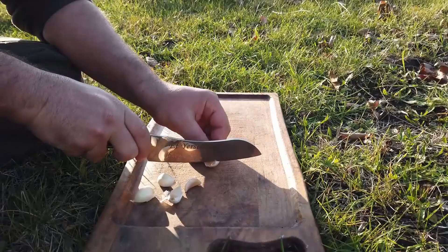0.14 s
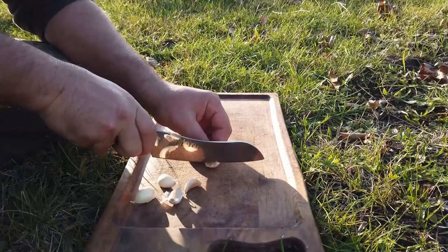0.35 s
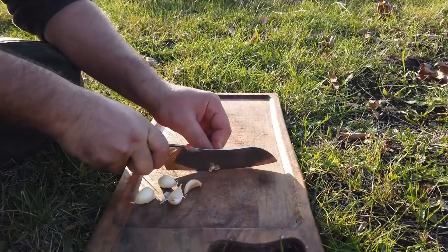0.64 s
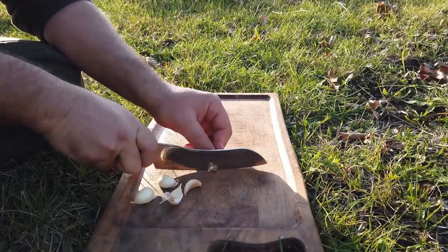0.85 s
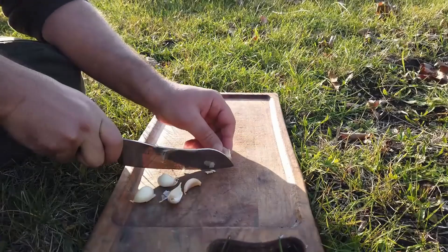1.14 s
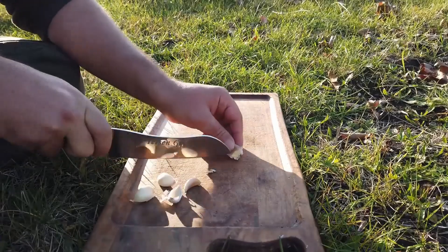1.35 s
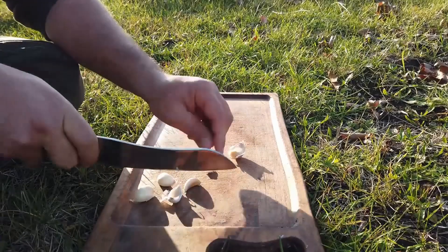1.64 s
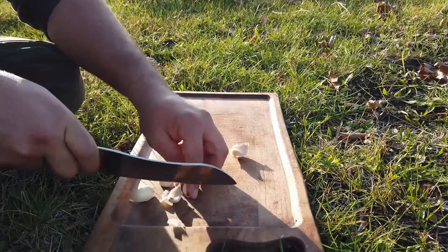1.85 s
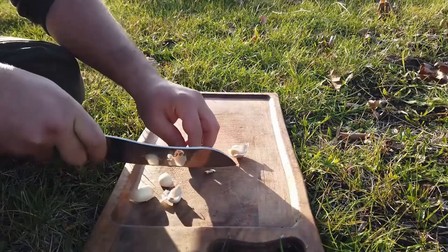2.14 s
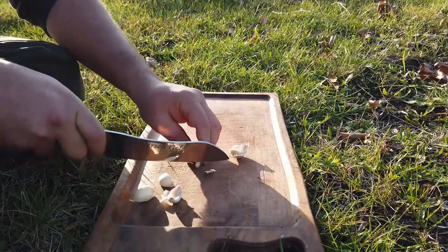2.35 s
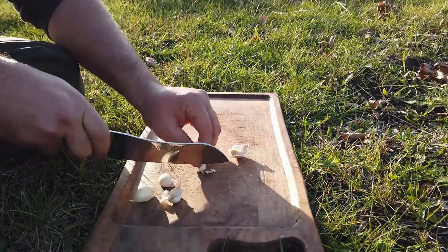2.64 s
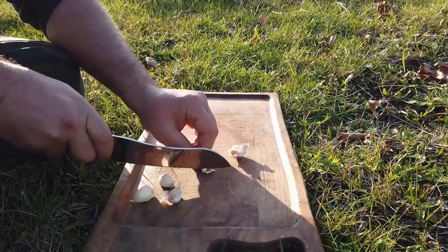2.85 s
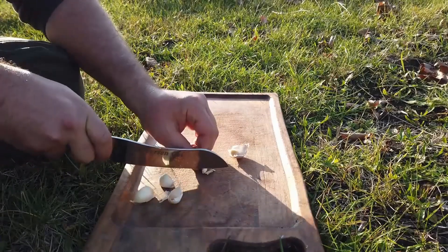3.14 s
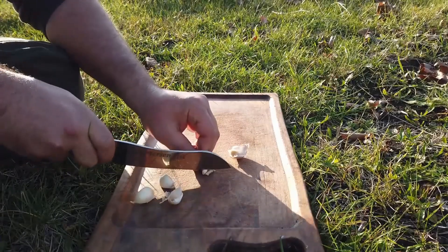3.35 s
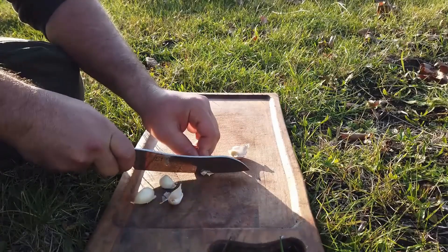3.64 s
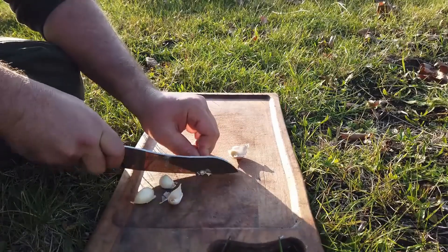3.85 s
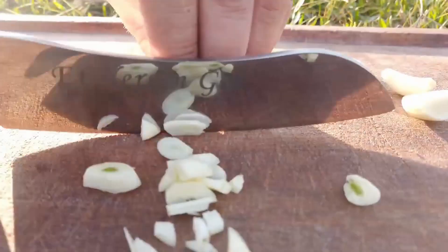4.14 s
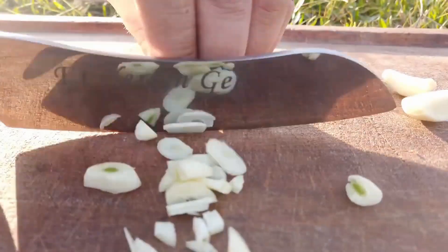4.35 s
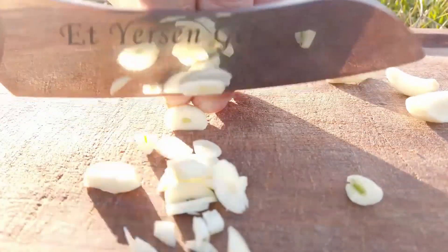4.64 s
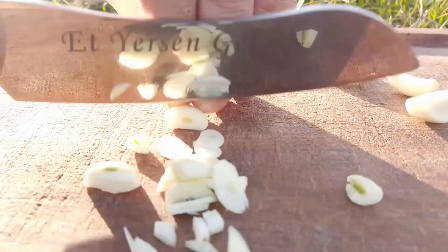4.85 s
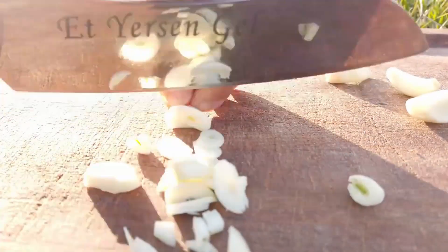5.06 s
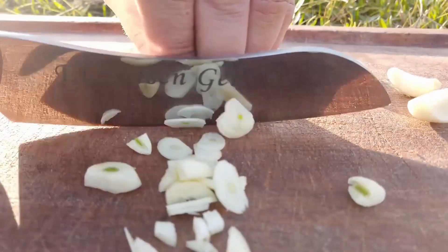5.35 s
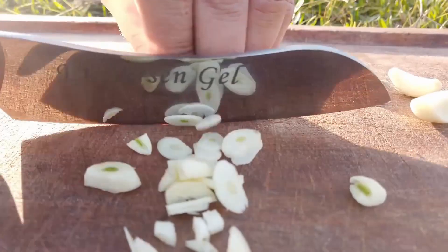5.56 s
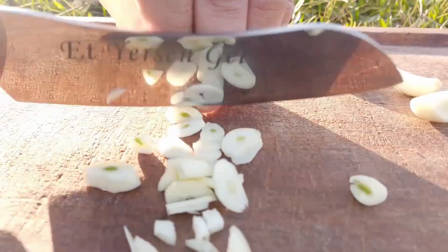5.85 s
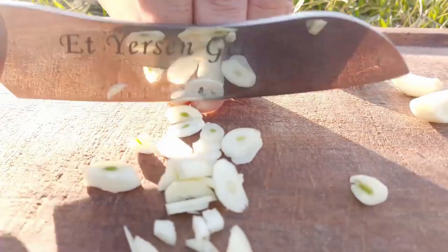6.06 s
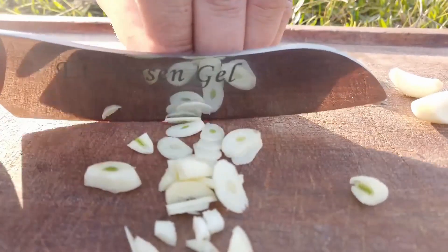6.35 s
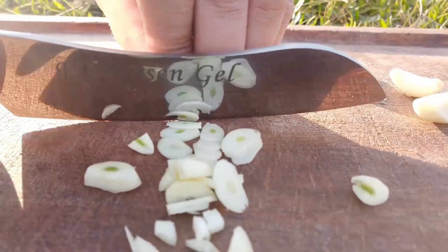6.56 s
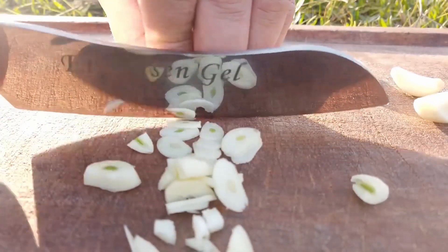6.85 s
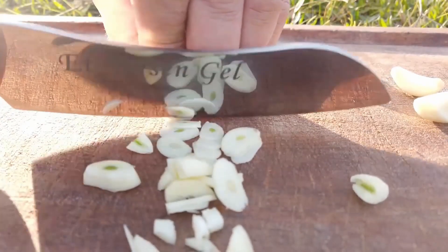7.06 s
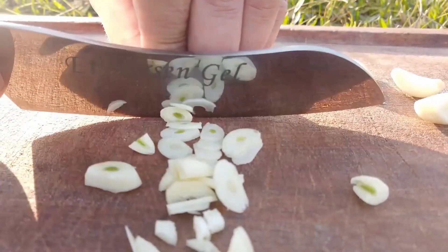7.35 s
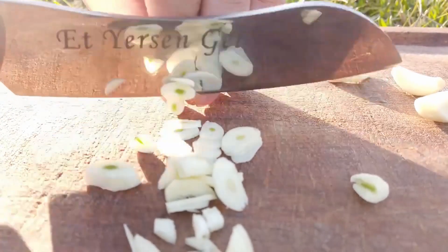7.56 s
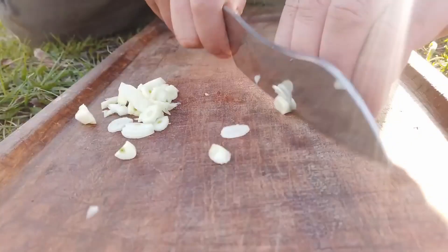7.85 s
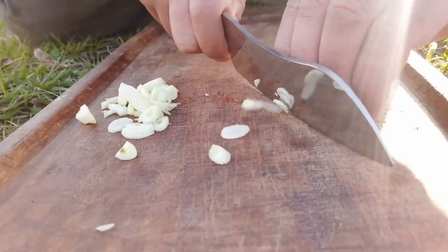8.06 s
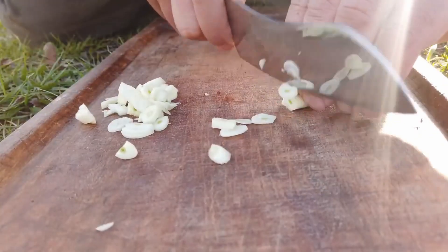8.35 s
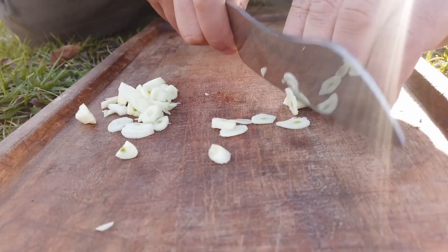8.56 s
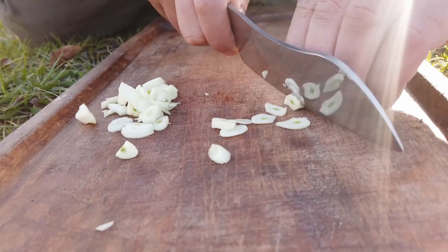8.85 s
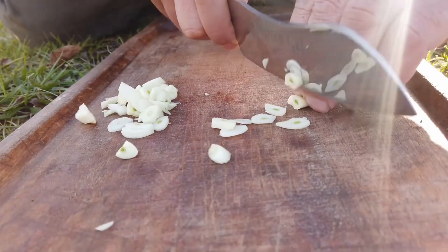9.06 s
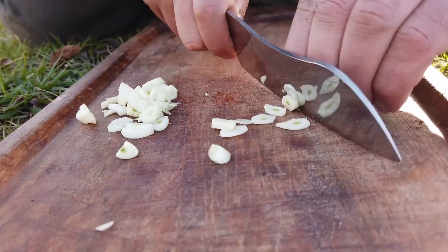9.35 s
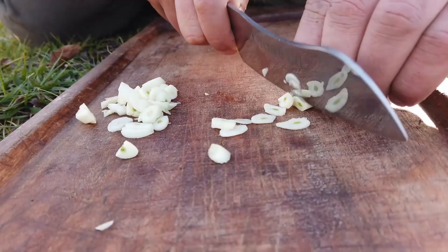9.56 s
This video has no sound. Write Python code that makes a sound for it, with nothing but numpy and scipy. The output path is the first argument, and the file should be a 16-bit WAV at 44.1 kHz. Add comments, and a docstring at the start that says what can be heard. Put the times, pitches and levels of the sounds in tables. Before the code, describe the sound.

Close outdoor sound of garlic being cut on a wooden board. Cloves snap in uneven crackly bursts with scraping blade and fingers, then faint rubbing and light taps in a quieter gap. More snaps follow, then quick steady chopping, each stroke a tiny wet crunch ending in a dry woody knock. Low wind buffets the microphone.

```python
"""Garlic is sliced with a kitchen knife on a wooden board that lies on a lawn, in a breeze.
First come slow cuts: cloves snap as sudden bursts of grainy noise, and the blade and fingers scrape
as swelling grainy noise. Light taps fall between these cuts. Then come quick strokes, about five a second:
noise ticks crunch through the clove, and most strokes end in a clear knock of damped board tones.
Filtered noise makes the wind on the microphone, the far rumble and the hiss of the air throughout."""
import sys
import numpy as np
from scipy import signal
from scipy.fft import rfft, irfft, next_fast_len
from scipy.io import wavfile
from scipy.ndimage import uniform_filter1d, minimum_filter1d

SR = 44100
rng = np.random.default_rng(int(sys.argv[2]) if len(sys.argv) > 2 else 0)


def to_wav(sig):
    """Store sig (one row per channel, or 1-D mono) as 16-bit WAV at the path in sys.argv[1].

    Samples outside -1..1 are clipped; the rate is SR.
    """
    pcm = np.clip(np.atleast_2d(sig), -1, 1) * 32767
    pcm = np.round(pcm).astype(np.int16)
    wavfile.write(sys.argv[1], SR, pcm.T)  # frames by channels


N = 427769
TIME = np.arange(N) / SR
MIDDLE_FROM_S, SIDE_FROM_S = 4.18, 7.71   # when the knife moves to the middle and side of the board


def from_db(db):
    """Turn decibels into a factor of amplitude."""
    return 10 ** (np.asarray(db) / 20)


def rms_one(x):
    """Scale a sound to an average (RMS) level of 1."""
    return x / np.sqrt(np.mean(x ** 2) + 1e-20)


def add(out, sound, s):
    """Mix a sound in at time s."""
    start = max(round(s * SR), 0)
    out[start:start + len(sound)] += sound[:max(N - start, 0)]


def band_pass(x, low_hz, high_hz):
    """Keep mainly what lies between two frequencies."""
    return signal.sosfilt(signal.butter(2, [low_hz, high_hz], "band", fs=SR, output="sos"), x)


def band_rms(x, low_hz, high_hz):
    """Strength of a sound within one band."""
    return np.std(band_pass(x, low_hz, high_hz)) + 1e-12


def coloured(x, colour):
    """Shape a sound to a spectrum with a filter that never sounds ahead of its input (minimum phase)."""
    size = next_fast_len(len(x), real=True) * 2
    hz, db = np.transpose(colour)
    bins = np.maximum(np.arange(size // 2 + 1) * SR / size, 1)
    curve_db = np.interp(np.log(bins), np.log(hz), db)
    # folding the cepstrum forward in time gives the minimum-phase response
    cepstrum = irfft(np.log(from_db(curve_db)))
    cepstrum[1:size // 2] *= 2
    cepstrum[size // 2 + 1:] = 0
    response = np.exp(rfft(cepstrum))
    return irfft(rfft(x, size) * response)[:len(x)]


def coloured_noise(size, colour):
    """Random noise with a given spectrum, at level 1."""
    return rms_one(coloured(rng.standard_normal(size), colour))


def drift(rate):
    """Slow chance of spread 1, turning about rate times a second."""
    step = 40   # samples between the slow values
    r = np.exp(-2 * np.pi * rate * step / SR)
    chance = rng.standard_normal(N // step + 2002)
    slow = signal.lfilter([1], [1, -2 * r, r * r], chance)[2000:]   # drop the settling of the filter
    return np.interp(np.arange(N) / step, np.arange(len(slow)), rms_one(slow))


def place(s):
    """Where the knife works at time s: 0 far end, 1 middle, 2 side."""
    return np.searchsorted([MIDDLE_FROM_S, SIDE_FROM_S], s)


# How strong the breeze is. Each row: time in seconds, deep buffeting in dB, lighter flutter in dB,
# both before the random swings.
WIND = [(0, -37.5, -45.5), (1.5, -41, -49), (2.6, -37.5, -53), (4.05, -39, -55), (4.301, -48, -61.5),
        (7.6, -49, -62), (7.8, -51.5, -53), (9.7, -50.5, -59.5)]
# Gusts that stand out of the breeze. Each row: time of the peak in seconds, deep buffeting in dB.
GUSTS = [(0.36, -33), (0.62, -31), (0.95, -27.5), (2.04, -33)]
# The spectra of buffeting, flutter, far rumble and open air.
# Each row: frequency in Hz, relative strength in dB.
WIND_COLOUR = [(2, -3.5), (6, 17), (14, 7), (25, -3), (45, 4), (80, -6.5), (120, -32.5), (200, -44),
               (400, -71.5), (1000, -100)]
FLUTTER_COLOUR = [(30, -23), (60, -12), (88, -1.5), (125, 2), (165, -2.5), (220, -11.5), (300, -21.5),
                  (450, -40), (900, -57), (2000, -89.5)]
RUMBLE_COLOUR = [(30, -17), (60, -4.5), (88, 2.5), (115, -10.5), (200, -19), (450, -49.5), (2000, -96.5)]
AIR_COLOUR = [(180, -26), (300, -0.5), (392, -6), (737, -6.5), (801, -5), (870, -11), (1780, -14),
              (2210, -18), (3830, -21), (6520, -20), (9880, -27.5), (15000, -29), (16000, -33.5)]
# Hiss of the open air in dB while the knife works at the far end, middle and side.
AIR_DB = (-62.5, -71.5, -72.5)


def outdoors(swing_db=1.0, flutter_swing_db=2.0, swings_per_s=3, rumble_db=-53, gust_width_s=0.043):
    """Deep buffeting with a few gusts and a lighter flutter of the breeze, over a far rumble and a thin hiss."""
    s, deep_db, light_db = np.transpose(WIND)
    wind = coloured(rng.standard_normal(N), WIND_COLOUR)
    wind /= band_rms(wind, 20, 90)
    flutter = coloured(rng.standard_normal(N), FLUTTER_COLOUR)
    flutter /= band_rms(flutter, 100, 240)
    air = coloured_noise(N, AIR_COLOUR) * from_db(AIR_DB)[place(TIME)]
    rumble = coloured_noise(N, RUMBLE_COLOUR) * from_db(rumble_db)
    eddies = drift(swings_per_s)   # buffeting and flutter swing together
    gusts = sum(from_db(db) * np.exp(-.5 * ((TIME - at) / gust_width_s) ** 2) for at, db in GUSTS)
    breeze = from_db(np.interp(TIME, s, deep_db) + swing_db * eddies)
    wind *= np.hypot(breeze, gusts)
    flutter *= from_db(np.interp(TIME, s, light_db) + flutter_swing_db * eddies)
    return wind + flutter + rumble + air


# Faint scatter from the garden. Each row: frequency in Hz, relative strength in dB.
SCATTER_COLOUR = [(100, 9.5), (500, -5.5), (1500, -18.5), (5000, 2.5), (14000, -11)]


def garden(x, scatter_db=-35, t60_s=.55):
    """A weak diffuse echo from the ground and things standing round, made by a fading burst of noise."""
    t = TIME[:SR // 2]
    burst = coloured(rng.standard_normal(len(t)), SCATTER_COLOUR)
    echo = burst * from_db(-60 * t / t60_s) * (t > .012)   # nothing returns in the first 12 ms
    return from_db(scatter_db) * signal.fftconvolve(x, echo / np.linalg.norm(echo))[:N]


def grains(size):
    """Dense tiny fractures, most of them weak and a few strong."""
    strength_db = 4 * np.minimum(rng.exponential(1, size), 5)
    return rng.standard_normal(size) * from_db(strength_db)


# The knife and board colour all rubbing and snapping.
# Each row: frequency in Hz, nominal width in Hz (peaks come out narrower, dips wider),
# height of the peak or depth of the dip in dB.
RUB_PEAKS = [(545.5, 200, 5.5), (752.8, 130, 8), (1170, 69, 8.5), (1480, 77, -3), (1700, 270, 10),
             (2140, 220, -11.5), (2830, 1500, 11.5), (3750, 520, -19), (3967, 250, 5), (5130, 230, 0.5),
             (5500, 740, -4), (8340, 150, -1.5)]


def through_knife(x):
    """The broad resonances and dips of blade and board, one after another."""
    for hz, width, db in RUB_PEAKS:
        sharpness = hz / width * from_db(db / 2)
        resonance = signal.lfilter(*signal.iirpeak(hz, sharpness, fs=SR), x)
        x = x + (from_db(db) - 1) * resonance
    return x


def friction(colour):
    """A steady grainy rub of level 1."""
    return rms_one(through_knife(coloured(grains(N), colour)))


# The flat of the blade brushing the guiding fingers. Each row: frequency in Hz, relative strength in dB.
BRUSH_COLOUR = [(1500, -34), (3500, -17.5), (4700, 4), (6200, -1.5), (7900, -3), (9500, -8.5),
                (13000, -23.5)]


def brushes(level_db=-72):
    """On its way down in the quick strokes, the blade brushes faintly past the fingers."""
    envelope = np.zeros(N)
    for s, _, length, _ in STROKES:
        lead, size_db = rng.uniform(.012, .035), 3 * rng.standard_normal()
        if s > MIDDLE_FROM_S:
            swell = np.hanning(SR // 30)
            add(envelope, from_db(level_db + size_db) * swell, s - length - lead)
    return envelope * friction(BRUSH_COLOUR)


# The dull rub of garlic moved over wood. Each row: frequency in Hz, relative strength in dB.
SHIFT_COLOUR = [(300, -20), (500, 3), (680, -3), (850, 3.5), (1100, 2), (1450, -8), (1750, -7.5),
                (2200, -18), (3000, -22), (6000, -26.5), (12000, -45.5)]


def nudges(level_db=-58, spread_db=3, t60=0.088):
    """Just after each quick knock the blade nudges the slice aside on the wood, a rub that fades."""
    envelope, t = np.zeros(N), TIME[:SR // 5]
    for s, *_ in STROKES:
        delay, size = rng.uniform(.015, .032), rng.standard_normal()
        if s > MIDDLE_FROM_S:
            add(envelope, from_db(level_db + spread_db * size - 60 * t / t60), s + delay)
    return uniform_filter1d(envelope, size=700) * friction(SHIFT_COLOUR)   # soften the onset


def drag(s, attack, t60, pressure_power=0.45):
    """Pressure grows as a power of the time since the drag began, then lets go."""
    growing = np.clip((TIME - s) / attack, 0, 1) ** pressure_power
    return growing * from_db(-60 * np.maximum(TIME - s - attack, 0) / t60)


# Slow drags of the blade over skin and wood. Each row: start in seconds, seconds of growing pressure,
# seconds for the release to fade by 60 dB, rub in dB, hiss in dB (both levels before the shared trims).
SLIDES = [(0.47, 0.086, 0.35, -58, -70), (0.62, 0.03, 0.093, -37, -52), (0.669, .025, .26, -46, -50),
          (0.907, 0.038, 1, -50, -56), (1.0, 0.072, 0.38, -49.5, -51), (3.52, 0.099, .3, -57, -67),
          (3.665, 0.049, .14, -39.5, -55.5), (3.819, 0.029, 1, -53, -59.5), (4.01, .075, 0.55, -50.5, -56)]
# Fingers shift the next clove about on the board. Each row: start in seconds, seconds of growing pressure,
# seconds for the release to fade by 60 dB, level in dB before the uneven grip.
SHIFTS = [(1.87, 0.4, .9, -57.5), (2.324, 0.028, 0.074, -51.5), (2.444, 0.01, 0.38, -45.5)]
# Low body and crisp top of drags and snaps. Each row: frequency in Hz, relative strength in dB.
BODY_COLOUR = [(200, -14.5), (500, -5), (850, 0.5), (1200, 0.5), (1750, 2.5), (2300, -4.5), (3000, -8),
               (4500, -14.5), (8000, -54)]
CRISP_COLOUR = [(2000, -25.5), (3500, 7), (4800, 7), (6800, 0), (9000, -2.5), (11000, -18.5), (15500, -14)]


def slides(rub_db=-1, hiss_db=-1, uneven_db=2, catches_per_s=40):
    """Steel and fingers drag over garlic skin and wood, catching unevenly as they go."""
    rub, hiss = np.zeros(N), np.zeros(N)
    for s, attack, t60, low_db, high_db in SLIDES:
        pressure = drag(s, attack, t60)
        rub += from_db(rub_db + low_db) * pressure
        hiss += from_db(hiss_db + high_db) * pressure
    shift = sum(from_db(db) * drag(s, attack, t60) for s, attack, t60, db in SHIFTS)
    # all dragging stops when the quick strokes begin
    grip = from_db(uneven_db * drift(catches_per_s)) * (TIME < MIDDLE_FROM_S)
    return grip * (rub * friction(BODY_COLOUR) + hiss * friction(CRISP_COLOUR) + shift * friction(SHIFT_COLOUR))


# Cloves and their skins snapping. Each row: time in seconds, woody body in dB, crisp top in dB
# (both before the shared trims), seconds for the body to fade by 60 dB.
SNAPS = [(0.35, -56, -55, 0.012), (0.379, -59, -51.5, 0.022), (0.507, -56, -50.5, 0.02),
         (0.552, -26.5, -31.5, 0.032), (0.578, -49.5, -56.8, 0.1), (0.643, -29.5, -31, 0.074),
         (0.7, -55, -49, 0.059), (0.719, -43, -40, 0.017), (0.734, -34.5, -31.5, 0.022),
         (0.916, -43, -37.5, 0.025), (1.051, -56, -35, 0.025), (2.447, -36, -76, 0.058),
         (3.648, -41.5, -46, 0.056), (3.671, -35, -45.5, 0.072), (3.849, -39.5, -44, 0.11),
         (4.028, -39.5, -35, 0.063), (7.334, -45, -55.5, 0.048)]


def snaps(body_db=3, crisp_db=3):
    """Sudden cracks that die away quickly, each with a woody body and a crisp top."""
    body, crisp, t = np.zeros(N), np.zeros(N), TIME[:SR // 5]
    for s, low_db, high_db, t60 in SNAPS:
        add(body, from_db(body_db + low_db - 60 * t / t60), s)
        add(crisp, from_db(crisp_db + high_db - 60 * t / (0.73 * t60)), s)   # the top fades sooner
    return body * friction(BODY_COLOUR) + crisp * friction(CRISP_COLOUR)


def radiated(x, low_hz=165, contact_hz=2700):
    """The board is too small to radiate deep bass, and the edge sinks in too gently for its highest notes."""
    return band_pass(x, low_hz, contact_hz)


# The crunch of a clove, also used for the steel click; the board shuddering on the grass after a knock;
# and wood fibres giving way under the edge. Each row: frequency in Hz, relative strength in dB.
CRUNCH_COLOUR = [(150, 5), (400, 8.5), (720, 9), (940, -2.5), (1400, 9), (2450, -3.5), (3500, -11),
                 (4500, -1.5), (6300, -1.5), (9000, -14), (10500, -25), (12800, -25), (15000, -38)]
SHUDDER_COLOUR = [(80, -10.5), (200, 6.5), (400, 3.5), (830, 2), (1150, -9.5), (1600, -20.5), (2500, -28),
                  (6000, -43)]
FIBRE_COLOUR = [(150, -15), (350, -1.5), (750, 3), (1000, -4.5), (1250, -0.5), (1800, -9.5), (2600, -16),
                (3500, -26.5), (8000, -46)]


def knock(modes, hardness_db, opposed, click_db=-21, click_t60=0.018, shudder_db=-27, fibre_db=-9,
          fibre_t60=0.034):
    """The edge hits the board: damped modes, a steel click, a crack of fibres and a faint shudder.

    hardness_db tilts the modes, in dB per octave: a harder blow is brighter."""
    t = TIME[:SR // 3]
    hz, db, t60 = np.transpose(modes)[:, :, None]
    # no two blows land on quite the same spot
    chance_db, detune, grip = rng.standard_normal((3, *hz.shape))
    hz = hz * (1 + .015 * detune)
    db = db + 1.3 * chance_db
    t60 = t60 * np.exp(.1 * grip)
    strength = from_db(db + hardness_db * np.log2(np.minimum(hz, 1400) / 500))
    signs = (-1) ** (opposed * np.arange(len(hz))[:, None])
    # bending waves spread at unequal speeds, so the higher modes start a trifle apart
    delay = (hz > 900) * rng.uniform(0, .0012, hz.shape)
    age = np.maximum(t - delay, 0)
    ringing = signs * strength * from_db(-60 * age / t60) * np.sin(2 * np.pi * hz * age)
    wood = radiated(np.sum(ringing, axis=0))
    wood /= band_rms(wood[:SR // 50], 250, 900)   # level 1 in the first 20 ms
    click = coloured_noise(len(t), CRUNCH_COLOUR) * from_db(click_db - 60 * t / click_t60)
    shudder = coloured_noise(len(t), SHUDDER_COLOUR) * from_db(shudder_db - 60 * t / .22)
    fibres = coloured_noise(len(t), FIBRE_COLOUR) * from_db(fibre_db - 60 * t / fibre_t60)
    return wood + click + fibres + shudder


# Light taps of the blade while the next clove is set in place.
# Each row: time in seconds, knock in dB, tilt towards the bright side in dB per octave.
TAPS = [(2.065, -45.5, 8.5), (2.355, -51, 14), (2.447, -47, 18), (2.493, -56, 4)]


def taps():
    """The blade touches the far end of the board without cutting."""
    out = np.zeros(N)
    for s, knock_db, hardness_db in TAPS:
        add(out, from_db(knock_db) * knock(BOARD_FAR, hardness_db, opposed=True), s)
    return out


def crunch(length, swell_db=4, release_t60=0.013):
    """The blade breaks the skin at once, then bursts cells in a few uneven ticks until it reaches the board."""
    t = TIME[:SR // 10]
    starts = np.cumsum(np.r_[0, rng.uniform(.003, .011, 12)])[:, None]
    sizes_db = np.r_[-1, 4 * rng.standard_normal(12)][:, None]
    fading = from_db(sizes_db - 60 * np.abs(t - starts) / .016)
    ticks = (t >= starts) * (starts < length) * fading
    tearing = from_db(-12 - 60 * np.maximum(t - length, 0) / release_t60)
    swell = from_db(swell_db * np.minimum(t / length, 1))
    shape = (ticks.sum(axis=0) + tearing) * swell
    colour = [(hz, db + 2.2 * rng.standard_normal()) for hz, db in CRUNCH_COLOUR]   # each crunch differs
    sound = coloured(rng.standard_normal(len(t)) * shape, colour)
    return sound / band_rms(sound[:round(length * SR)], 3000, 12000)


# Cuts through a clove. Each row: time in seconds when the edge meets the board, knock in dB before
# the shared trim, seconds spent in the clove, crunch in dB.
STROKES = [(0.6552, -22, .028, -49), (3.876, -41.5, 0.1, -85.5), (4.2605, -21.5, .023, -43.5),
           (4.463, -19.5, 0.018, -45), (4.6635, -19.5, .024, -46.5), (4.8696, -26, 0.027, -46),
           (5.064, -23, .024, -46.5), (5.2643, -19.5, .017, -42.5), (5.4748, -20.5, 0.018, -43.5),
           (5.6825, -25.5, 0.027, -45.5), (5.866, -19, 0.02, -51), (6.068, -20.5, 0.016, -54.5),
           (6.2895, -29.5, 0.035, -49.5), (6.4706, -23, 0.017, -74.5), (6.6878, -26.5, .021, -46.5),
           (6.8802, -23.5, 0.024, -68), (7.1109, -24, 0.021, -65.5), (7.4481, -22.5, .017, -48),
           (7.787, -14, 0.014, -45), (7.9907, -17.5, 0.027, -43.5), (8.1689, -15.5, .015, -44),
           (8.3659, -17.5, 0.014, -42), (8.5489, -20.5, 0.021, -42.5), (8.719, -17.5, 0.018, -59.5),
           (8.899, -55, 0.019, -47), (9.0737, -21.5, 0.022, -45.5), (9.255, -16.5, 0.012, -54.5),
           (9.422, -22, 0.015, -66.5), (9.6, -25, 0.028, -49.5)]
# How the board rings when struck at its far end, middle and side, before each blow's random spread.
# Each row: frequency in Hz, relative level in dB, seconds to fade by 60 dB.
BOARD_FAR = [(184, -14.5, 0.099), (294, -5, 0.041), (445, -5, 0.091), (616, 0, 0.045), (802, -0.5, 0.041),
             (998, -2.5, 0.026), (1102, -3, 0.055), (1300, -16.5, 0.029), (1650, -11, 0.023),
             (2030, -30, 0.014), (2770, -34.5, 0.019)]
BOARD_MIDDLE = [(174, -15.5, 0.016), (323, -13.5, 0.094), (388.4, 5, 0.048), (485.4, 1.5, 0.062),
                (600, -1, 0.054), (660, 2.5, 0.049), (689, -10, 0.099), (1153, -19.5, 0.041),
                (1160, -12, 0.034), (1370, -27.5, 0.044), (1592, -26.5, 0.041), (1806, -33.5, 0.042),
                (2506, -28, 0.023)]
BOARD_SIDE = [(192.4, -25.5, .089), (308.6, -6, 0.035), (398.5, -1.5, 0.015), (443, -17, .073),
              (554, -5, 0.027), (637.5, -16.5, 0.073), (697, 0.5, 0.038), (800, -0.5, 0.0054),
              (910, -16.5, 0.051), (1150, -19, 0.046), (1266, -9.5, 0.031), (1592, -14, 0.027),
              (1715, -13.5, 0.028), (1870, -23, 0.0059), (2520, -39.5, 0.012), (2510, -31.5, 0.031),
              (3090, -35.5, 0.028), (4020, -35, 0.027)]
# A stronger knock is brighter: tilt of the usual knock in dB per octave, further tilt for each dB of strength.
TILT_FAR, TILT_MIDDLE, TILT_SIDE = (.1, 0.4), (3.6, 2.1), (-2.1, 0.53)


def strokes(board_db=-0.12, usual_knock_db=-21):
    """Every stroke is a crunch that ends in a knock, the stronger the brighter."""
    out = np.zeros(N)
    boards = [(BOARD_FAR, TILT_FAR), (BOARD_MIDDLE, TILT_MIDDLE), (BOARD_SIDE, TILT_SIDE)]
    for s, knock_db, length, crunch_db in STROKES:
        modes, (usual_tilt, tilt_per_db) = boards[place(s)]
        hardness_db = usual_tilt + tilt_per_db * (knock_db - usual_knock_db)
        # in the middle all modes swing the same way; near an edge neighbouring modes swing in opposition
        blow = knock(modes, hardness_db, opposed=modes is not BOARD_MIDDLE)
        add(out, from_db(board_db + knock_db) * blow, s)
        add(out, from_db(crunch_db) * crunch(length), s - length)
    return out


def scene():
    """Knife sounds, soft at the very top, with their echo and the weather."""
    knife = strokes() + taps() + snaps() + slides() + brushes() + nudges()
    knife = signal.sosfilt(signal.butter(6, 13200, fs=SR, output="sos"), knife)
    return (knife + garden(knife) + outdoors())[None]


def record(dry, limit_db=-3, release_db_per_s=697.5, cutoff_hz=15900):
    """A fast limiter holds down the hardest knocks, and the top is cut steeply."""
    over_db = np.maximum(20 * np.log10(np.abs(dry) + 1e-9) - limit_db, 0)
    recovery = release_db_per_s * TIME
    gain_db = recovery - np.maximum.accumulate(over_db + recovery, axis=-1)
    # hold each dip a little wider, then smooth it
    gain_db = uniform_filter1d(minimum_filter1d(gain_db, size=60), size=60)
    top_cut = signal.ellip(10, .1, 70, cutoff_hz, fs=SR, output="sos")
    return signal.sosfilt(top_cut, dry * from_db(gain_db))


dry = scene()
out = record(dry)
to_wav(out)
```